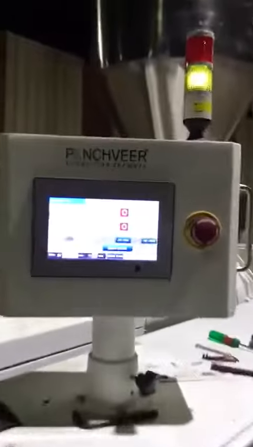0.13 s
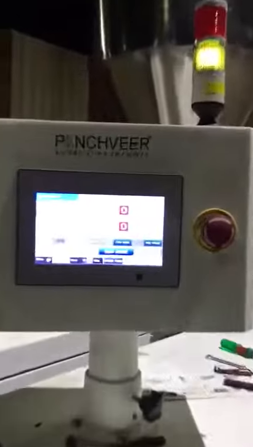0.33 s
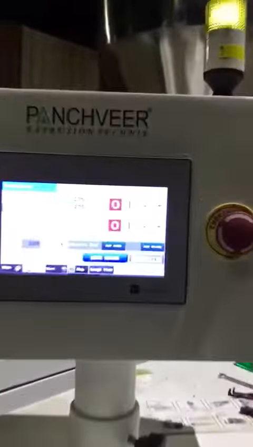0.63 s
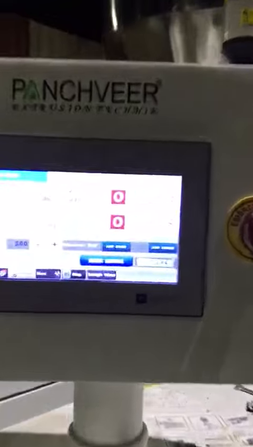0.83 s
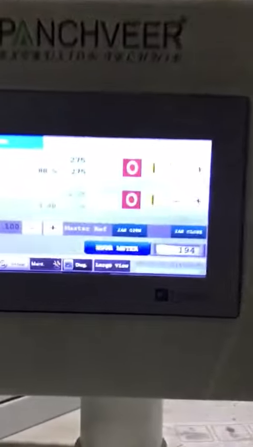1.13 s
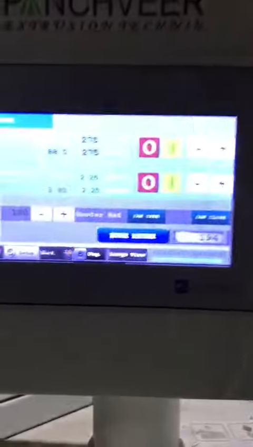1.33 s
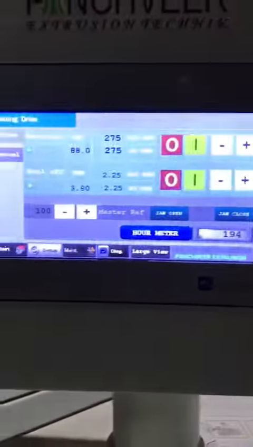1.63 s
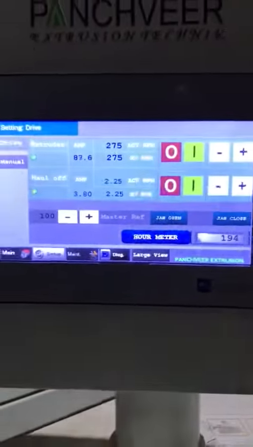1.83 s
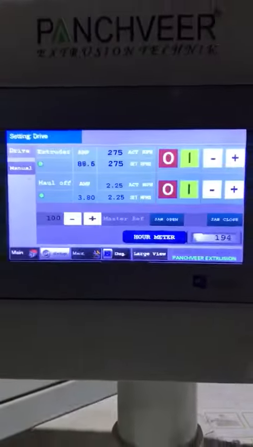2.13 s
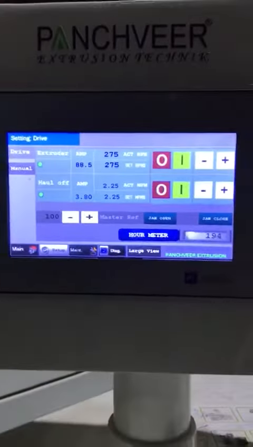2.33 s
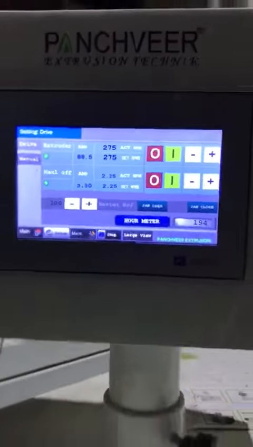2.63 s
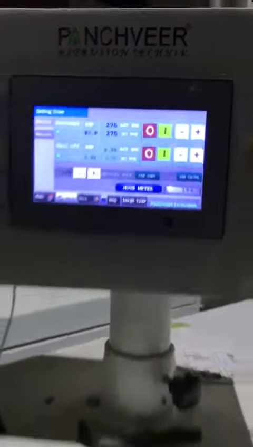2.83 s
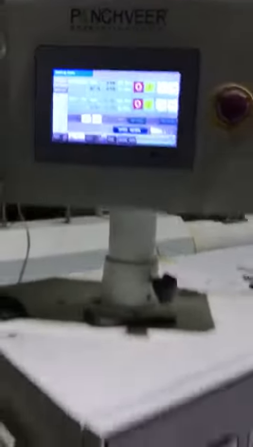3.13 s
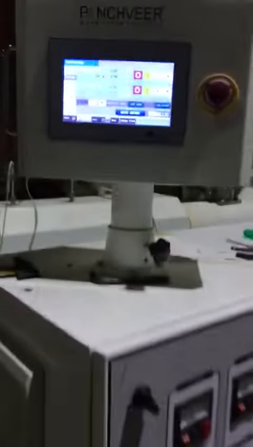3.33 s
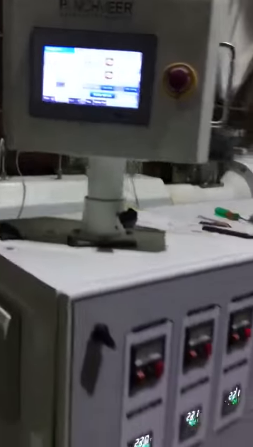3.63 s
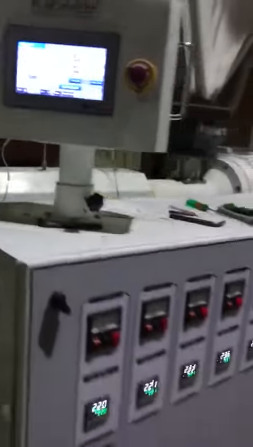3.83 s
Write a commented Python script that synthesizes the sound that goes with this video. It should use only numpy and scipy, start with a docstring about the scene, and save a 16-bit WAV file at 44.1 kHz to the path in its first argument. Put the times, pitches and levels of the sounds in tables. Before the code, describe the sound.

Continuous extrusion machine noise: a buzzing, wavering motor whine, pulsing low gear tone and broad airy roar, heard by a moving microphone nearby in a hard, reverberant hall, with no start or stop.

```python
"""In a factory hall a plastic extrusion line runs on while the microphone moves up to its control panel and away.
The main drive is a harmonic series, modulated in amplitude and phase once per shaft turn and surging with a belt.
Each partial swells and fades as the microphone passes through the hall's standing waves.
The belt also pulses a low gear tone. Smaller motors add wavering hum and one thin high tone.
Behind them blowers roar as shaped noise, and ducts and panels ring as narrow noise bands."""
import sys
import numpy as np
from scipy import signal
from scipy.fft import rfft, irfft, next_fast_len
from scipy.io import wavfile
from scipy.ndimage import uniform_filter1d, map_coordinates

SR = 44100
rng = np.random.default_rng(int(sys.argv[2]) if len(sys.argv) > 2 else 0)


def to_wav(sig):
    """Store sig (one row per channel, or 1-D mono) as 16-bit WAV at the path in sys.argv[1].

    Samples outside -1..1 are clipped; the rate is SR.
    """
    pcm = np.clip(np.atleast_2d(sig), -1, 1) * 32767
    pcm = np.round(pcm).astype(np.int16)
    wavfile.write(sys.argv[1], SR, pcm.T)  # frames by channels


N = 175077
TIME = np.arange(N) / SR


def amp(db):
    """Decibel law: an amplitude ratio is ten to the power of level over twenty."""
    return 10 ** (np.asarray(db) / 20)


def unit(x):
    """Normalization: scale to an rms of 1."""
    return x / np.sqrt(np.mean(np.abs(x) ** 2) + 1e-20)


def curves(rows):
    """Linear interpolation: one value per sample for each column after the time."""
    time_s, *columns = np.transpose(rows)
    return [np.interp(TIME, time_s, column) for column in columns]


def wobble(rate):
    """Band-limited randomness: a smooth curve through random knots, rate of them a second."""
    knots = rng.standard_normal(256)
    return unit(map_coordinates(knots, [TIME * rate + 2], mode="mirror"))


def drift(rate):
    """Random complex envelope: a wandering strength and phase, rms 1."""
    return unit(wobble(rate) + 1j * wobble(rate))


def spin(hz):
    """Rotating phasor: starts at a random phase, and its real part has rms 1."""
    return np.sqrt(2) * np.exp(2j * np.pi * (hz * TIME + rng.random()))


def filtered(x, response):
    """Linear filtering: multiply the spectrum by a response of frequency."""
    size = next_fast_len(N + SR // 2)  # zero padding
    spectrum = rfft(x, size) * response(np.fft.rfftfreq(size, 1 / SR))
    return irfft(spectrum, size)[..., :N]


WHINE_HZ, CYCLES_PER_TURN = 750.0, 42  # fundamental; its cycles in one shaft turn
SIDEBAND_FALL_DB, SCATTER_PER_S = 10.5, 2.93  # loss per sideband order; knots a second in the scatter
# The belt's laps a second, first crest of the surge [s] and its depth [0-1]
BELT_HZ, SURGE_CREST_S, SURGE_DEPTH = 5.08, 0.19, 0.5
# Level of each whine partial at the microphone:
# time_s, first_db, second_db, third_db, fourth_db, fifth_db
WHINE_LEVELS = [(0, -27.7, -30, -30, -37, -40), (0.15, -25, -26.5, -27, -38, -41),
                (0.35, -26.5, -22.5, -30.5, -37.5, -45.5), (0.6, -29.5, -26.5, -27, -31.5, -44),
                (0.85, -31, -28.5, -33.5, -30.5, -44), (1.2, -27.6, -28.3, -33, -36.3, -44),
                (1.6, -28.5, -28, -31, -35.5, -46), (2, -31.5, -28.5, -35, -35, -42),
                (2.35, -29.5, -26.5, -36, -31.5, -47), (2.6, -29.5, -28.5, -29, -33.0, -39.5),
                (2.8, -27.5, -24, -35.7, -39, -41), (3.0, -22.5, -33.5, -34.5, -43, -43),
                (3.2, -25, -22.5, -32.5, -34, -30), (3.4, -27, -22, -28, -39, -44),
                (3.55, -25, -24, -32, -37.5, -34), (3.75, -25, -30, -37.5, -36, -41.5),
                (3.97, -32.5, -34, -31.5, -34, -43)]
# Throb of each partial, one row a partial; the depth is before the strength factor below:
# depth (0-1), crest_s, phase_sway_rad, scattered_sidebands_db (relative to the throbbing tone)
PARTIAL_THROB = [(0.36, .022, 0.28, -9.5), (0.5, .055, -0.034, -6), (0.36, 0.0472, 0.54, -10.5),
                 (0.04, 0.0565, 0.78, -4.5), (0.6, 0.018, 0.15, -6)]
# How strongly the throb comes through along the microphone's path:
# time_s, strength (factor on the throb depth)
THROB_ALONG_PATH = [(0, 0.53), (.4, 0.89), (.8, 0.91), (1.25, 1.7), (2.1, 1.7), (2.45, 0.66), (2.75, 1.3),
                    (3.05, 0.98), (3.4, 1.1), (3.97, 0.44)]


def drive():
    """Amplitude and phase modulation: each shaft turn throbs the whine; the hall scatters its sidebands."""
    whine = np.zeros(N)
    strength, = curves(THROB_ALONG_PATH)
    partials = zip(curves(WHINE_LEVELS), PARTIAL_THROB)
    for k, (level_db, (depth, crest_s, sway_rad, scatter_db)) in enumerate(partials, 1):
        shaft = 2 * np.pi * WHINE_HZ / CYCLES_PER_TURN * (TIME - crest_s)
        throb = 1 + strength * depth * np.cos(shaft)
        sway = np.exp(-1j * sway_rad * np.sin(shaft))
        # Sidebands on either side, each with its own wandering strength and phase
        scatter = sum(
            amp(-SIDEBAND_FALL_DB * abs(n)) * drift(SCATTER_PER_S) * np.exp(1j * n * shaft)
            for n in (-3, -2, -1, 1, 2, 3))
        tone = unit(throb * sway) + amp(scatter_db) * unit(scatter)
        if k == 1:  # the passing belt makes only the first partial surge
            tone = tone * (1 + SURGE_DEPTH * np.cos(2 * np.pi * BELT_HZ * (TIME - SURGE_CREST_S)))
        whine += amp(level_db) * np.real(unit(tone) * spin(k * WHINE_HZ))
    return whine


GEAR_HZ, GEAR_CREST_S = 303.6, 0.097
GEAR_DB = -34  # before the fullness of the low roar is added
GEAR_LAP_DEPTH, GEAR_HALF_LAP_DEPTH = 0.47, 0.63  # pulsing once and twice per belt lap


def gear():
    """Periodic amplitude modulation: the belt pulses a low tone, two humps per lap."""
    lap = 2 * np.pi * BELT_HZ * (TIME - GEAR_CREST_S)
    pulse = 1 + GEAR_LAP_DEPTH * np.cos(lap) + GEAR_HALF_LAP_DEPTH * np.cos(2 * lap)
    fullness_db, = curves(FULLNESS_ALONG_PATH)
    return amp(GEAR_DB + fullness_db) * unit(pulse) * np.real(spin(GEAR_HZ))


HUM_TRIM_DB = -1  # added to every hum line
HUM_WAVER = 0.38  # wandering part relative to the steady part
SING_HZ = 2049
# Hum lines of the smaller motors and fans: pitch_hz, level_db (before the trim)
HUM_LINES = [(77.2, -37.8), (98.5, -45), (144.2, -42), (153.9, -41), (214.5, -44), (230.9, -37),
             (288.3, -39), (344, -45), (369.5, -45), (464.3, -42), (546.7, -40), (576.5, -40), (607.5, -41)]
# Level of the thin motor tone: time_s, level_db
SING_LEVEL = [(0, -38), (0.2, -38.3), (0.5, -50), (0.95, -34), (1.7, -56), (2.45, -36.5), (3.25, -53),
              (3.5, -36), (3.7, -62)]


def motors():
    """Superposition: slightly wavering low lines add to one thin high tone of steady pitch."""
    hum = np.zeros(N)
    for pitch_hz, level_db in HUM_LINES:
        waver = unit(1 + HUM_WAVER * drift(1.97))
        hum += amp(level_db) * np.real(waver * spin(pitch_hz))
    sing_db, = curves(SING_LEVEL)
    return amp(HUM_TRIM_DB) * hum + amp(sing_db) * np.real(spin(SING_HZ))


ROAR_DB = -22  # whole roar, before the fullness
PATCHY_DB = 0.7  # rms level of the turbulent patches
CROSSOVER_HZ, TREBLE_SHARE = 550, 0.24  # low roar to treble; share of the fullness in dB
HISS_HZ, HISS_FLUTTER_DB, HISS_FLUTTER_PER_S = 5000, 0.96, 11  # the last in knots a second
# Spectrum of the blowers' roar: frequency_hz, density_db (relative, per Hz)
ROAR_SPECTRUM = [(20, -38), (29, -29), (48, -6), (62, -12), (90, -5), (125, -6), (170, 1), (260, -4.5),
                 (330, -2), (430, -4), (590, -3.5), (650, -7.5), (790, -3), (860, -5.5), (1020, -4.5),
                 (1400, -9.5), (1900, -11.5), (2700, -12), (3150, -15.5), (3500, -17), (4400, -20.5),
                 (4950, -24), (6100, -24), (7500, -28), (9500, -30), (10450, -34), (11100, -30.5),
                 (11700, -37.5)]
# Gain of the low roar along the microphone's path, fuller close to the panel: time_s, gain_db
FULLNESS_ALONG_PATH = [(0, 0), (.6, -0.3), (1.0, 1.1), (2.1, 1.45), (2.9, 0.8), (3.45, -2), (3.97, 0.8)]


def blowers():
    """Broadband turbulence: shaped noise in faint patches, fuller in the bass near the panel, hiss fluttering."""
    grid = signal.stft(rng.standard_normal(N), nperseg=512)[2]
    # Random gains smoothed over neighbouring frequencies, then over time
    patches = uniform_filter1d(rng.standard_normal(grid.shape), size=6, axis=0)
    patches = uniform_filter1d(patches, size=14, axis=1)
    air = signal.istft(grid * amp(PATCHY_DB * unit(patches)), nperseg=512)[1][:N]

    frequency_hz, density_db = np.transpose(ROAR_SPECTRUM)
    roar = unit(filtered(air, lambda f: amp(np.interp(np.log(f + 1), np.log(frequency_hz), density_db))))
    low = filtered(roar, lambda f: 1 / (1 + (f / CROSSOVER_HZ) ** 2))
    hiss = filtered(roar, lambda f: f ** 2 / (f ** 2 + HISS_HZ ** 2))
    flutter = amp(HISS_FLUTTER_DB * wobble(HISS_FLUTTER_PER_S))
    treble = roar - low + hiss * (flutter - 1)

    fullness_db, = curves(FULLNESS_ALONG_PATH)
    return amp(ROAR_DB) * (amp(fullness_db) * low + amp(TREBLE_SHARE * fullness_db) * treble)


# Ducts and panels that ring in the roar, plus one narrow band just below the gear tone (298.5 Hz), where the
# belt's pulsing spreads it: centre_hz, width_hz (about half-power), level_db
RINGING_PANELS = [(177, 16, -39), (233, 19, -38), (298.5, 5.3, -44), (339, 12, -39.5), (700, 28, -34),
                  (1248, 6.7, -41), (2152, 39, -42), (2625, 23, -44), (2980, 110, -39), (3170, 29, -50)]


def panels():
    """Resonance under random excitation: noise passes only in narrow bands."""
    ringing = np.zeros(N)
    for centre_hz, width_hz, level_db in RINGING_PANELS:
        shaking = rng.standard_normal(N)
        ring = filtered(shaking, lambda f: 1 / (1 + ((f - centre_hz) / (0.81 * width_hz)) ** 2))
        ringing += amp(level_db) * unit(ring)
    return ringing


def scene():
    """Superposition at one microphone: all sources add, alike in both channels."""
    mix = drive() + gear() + motors() + blowers() + panels()
    return np.array([mix, mix])


def record(dry):
    """Band limiting: an ideal low-pass keeps nothing from 11800 Hz up."""
    return filtered(dry, lambda f: f < 11800)


dry = scene()
out = record(dry)
to_wav(out)
```